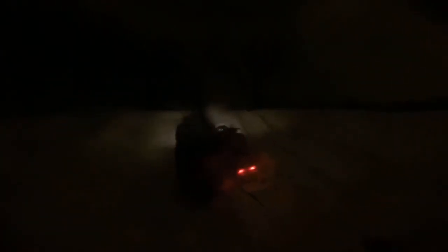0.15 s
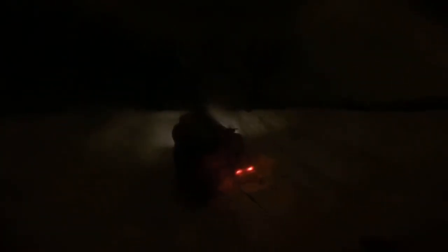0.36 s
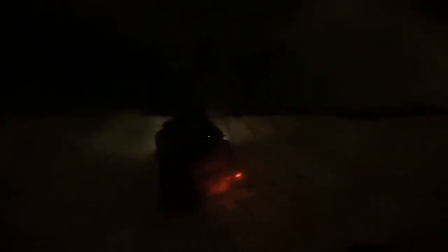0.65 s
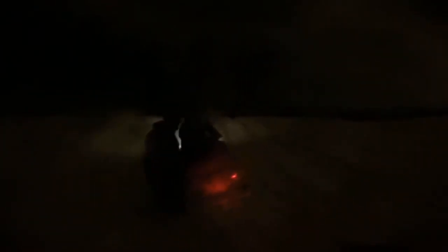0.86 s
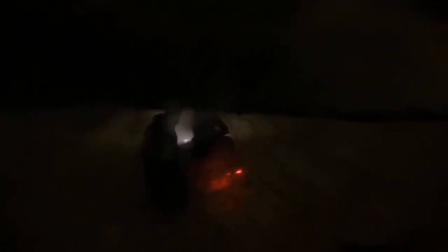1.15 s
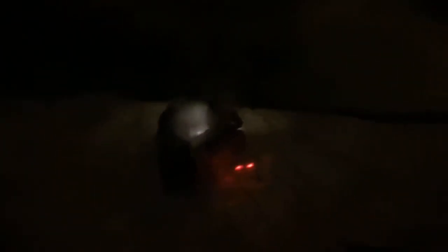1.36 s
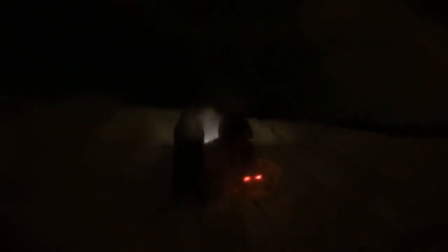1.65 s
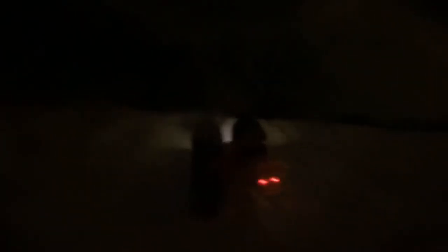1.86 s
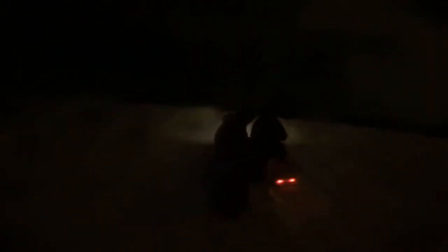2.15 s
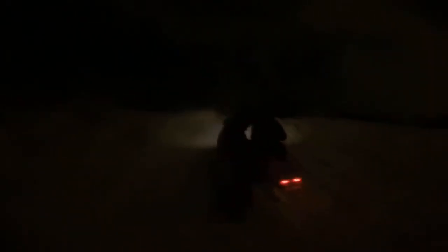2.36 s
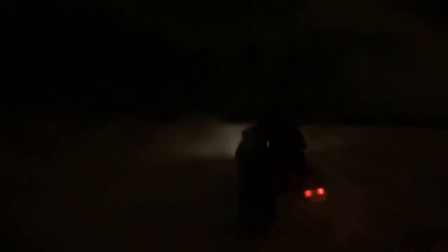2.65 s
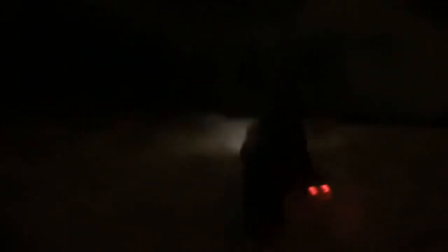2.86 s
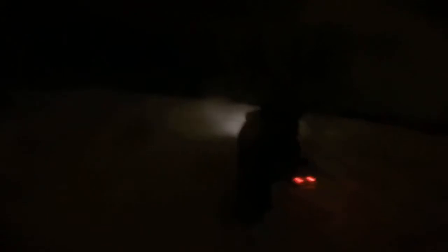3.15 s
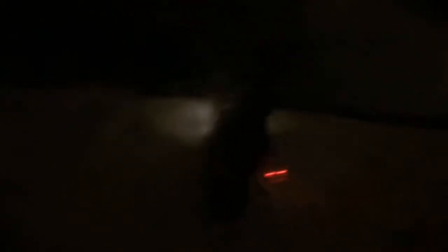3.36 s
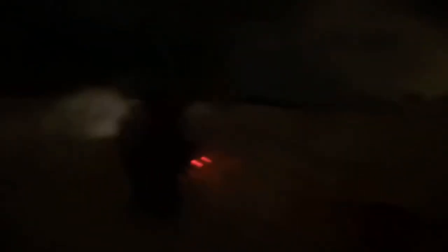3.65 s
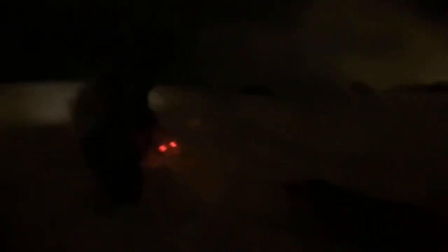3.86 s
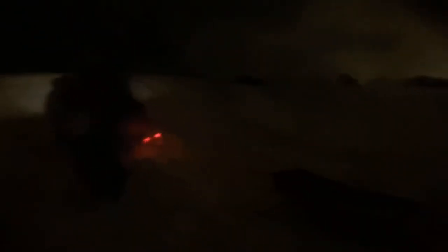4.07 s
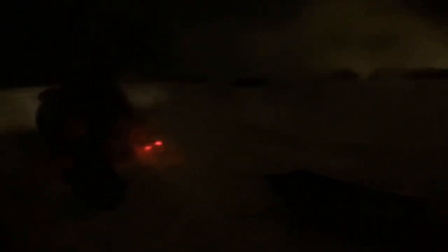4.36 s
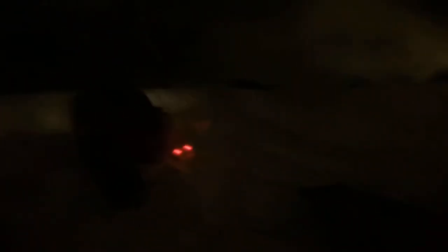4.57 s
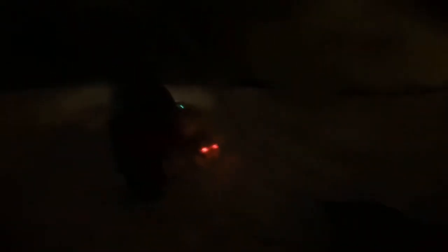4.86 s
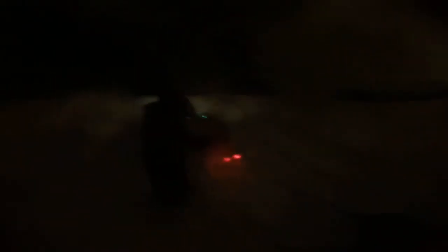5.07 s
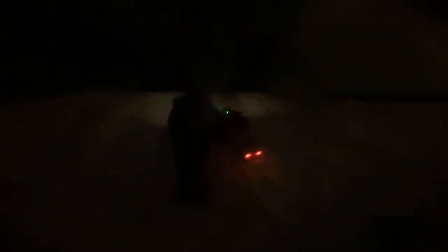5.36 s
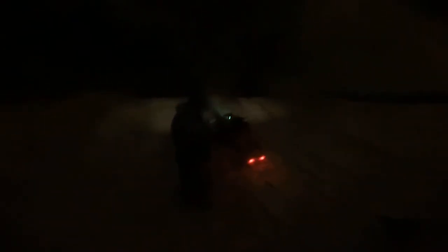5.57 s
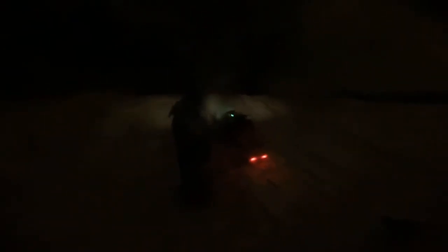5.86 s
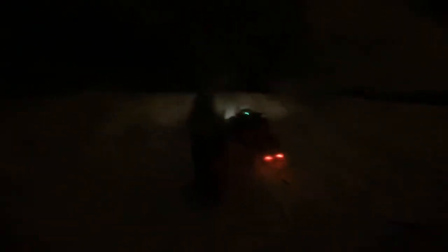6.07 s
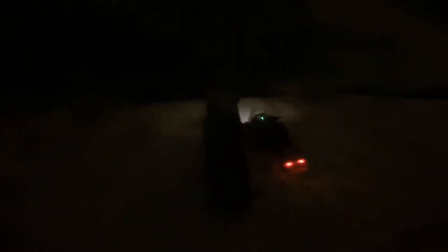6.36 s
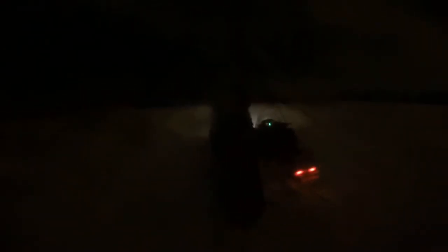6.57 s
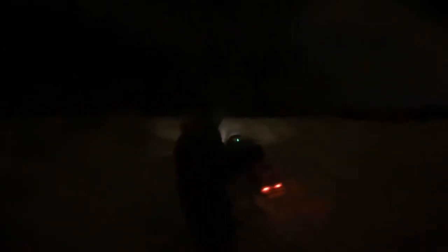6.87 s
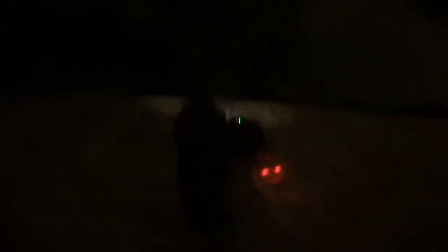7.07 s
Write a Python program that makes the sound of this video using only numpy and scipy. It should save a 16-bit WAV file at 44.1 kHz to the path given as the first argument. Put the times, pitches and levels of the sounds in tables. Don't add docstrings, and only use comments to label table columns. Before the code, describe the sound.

A snowmobile idles lumpily on open snow, revs up with a belt howl, drops to a steady idle; sharp plastic snaps and wind thumps close by.

```python
import sys
import numpy as np
from scipy import signal
from scipy.fft import next_fast_len
from scipy.io import wavfile
from scipy.ndimage import uniform_filter1d

SR = 44100
rng = np.random.default_rng(int(sys.argv[2]) if len(sys.argv) > 2 else 0)


def to_linear_factor(level_db):
    exponent = np.asarray(level_db, float) / 20
    return 10 ** exponent


def transcribe(signal):
    frames = np.atleast_2d(signal).T
    limited = np.clip(frames, -1, 1)
    pcm = np.round(limited * 32767).astype(np.int16)
    wavfile.write(sys.argv[1], SR, pcm)


N = 318428
T = np.arange(N) / SR
F = np.fft.rfftfreq(next_fast_len(N), 1 / SR)


def curves(table):
    s, *columns = np.transpose(table)
    return [np.interp(T, s, c) for c in columns]


def swells(rows):
    coarse = T[::32]
    total = sum(db * np.exp(-((coarse - s) / half) ** 2) for s, db, half in rows)
    return np.interp(T, coarse, total)


def slope(points):
    hz, db = np.transpose(points)
    return to_linear_factor(np.interp(np.log(F + 1), np.log(hz), db, left=-120, right=-120))


def noise(gain, shift=0):
    spectrum = gain * (rng.standard_normal(len(F)) + 1j * rng.standard_normal(len(F)))
    x = np.fft.ifft(spectrum, next_fast_len(N))[:N]
    if np.ndim(shift):
        x = x * np.exp(1j * shift)
    return x.real / np.std(x.real)


def resonance(hz, half_width):
    return 1 / (1 + ((F - hz) / half_width) ** 2)


def walk(rate):
    k = int(SR / rate)
    held = np.repeat(rng.standard_normal(N // k + 1), k)
    return 1.337 * uniform_filter1d(uniform_filter1d(held, k), k)[:N]


# centre in seconds, strength in dB over the lull, half length in seconds.
GUST_SWELLS = [(.17, -2, 0.053), (.54, 2, .05), (1.33, 6, 0.078), (1.974, 14, 0.047), (2.45, 10, 0.11),
               (2.9, 12.5, 0.14), (3.64, 7, .08), (3.899, 7, 0.048), (4.15, 9.5, 0.11), (4.5, 7.5, .05),
               (4.854, 14, 0.15), (5.42, 12.5, .1), (5.7, 9, .06), (5.95, 5.5, .1), (6.634, 13, 0.13),
               (7.0, 13, .07)]


def wind():
    gust_db = swells(GUST_SWELLS)
    buffet_db = -53 + gust_db
    rumble_db = -55 + 0.73 * gust_db + 2.2 * walk(14)
    buffet = noise(slope([(3, -2), (7, -4.5), (16, -6), (26, -25.5)]))
    rumble = noise(slope([(18, 3), (26, 5.0), (45, -22), (70, -29.0), (110, -28)]))
    return to_linear_factor(buffet_db) * buffet + to_linear_factor(rumble_db) * rumble


# centre in seconds, pitch in Hz, peak
# in dB, half length in seconds.
DULL_THUMPS = [
    (1.284, 58.4, -43, 0.043),
    (1.96, 74.6, -43, 0.051),
    (3.895, 27.87, -33.5, 0.03),
    (3.9, 189.3, -53, 0.022),
    (4.12, 147.5, -59, 0.02),
    (6.72, 140.6, -47, 0.021),
    (7.18, 440, -56, 0.028),
]


def thumps():
    return sum(to_linear_factor(db) * np.exp(-((T - s) / half) ** 2) * np.sin(2 * np.pi * hz * (s - T))
               for s, hz, db, half in DULL_THUMPS)


# start in seconds, casing body in dB, seam in dB, crispness in dB, hollowness in dB.
CASING_SNAPS = [(0.4328, -52, -55.5, -5, -4), (0.5718, -35.5, -47, 0, 6), (2.13, -11, -18.5, -7, 0.5),
                (3.0015, -28, -29.5, 0.5, -3.5), (3.0059, -39, -54, -1.1, -2), (3.0421, -41, -42.5, -6, 16),
                (3.2896, -23.5, -34.5, 0.5, 6), (3.37, -22.5, -25, 0.5, -3), (4.1984, -45.5, -50, -7, 0),
                (4.2731, -52.5, -64.5, -18, -5), (4.6643, -64, -40.5, -7, 0), (4.9933, -14, -25, 5.5, 50),
                (5.3532, -58, -50.5, -3, -3), (5.5294, -24.5, -21, -11.5, 4), (5.7985, -45, -42, -9, 5),
                (5.8603, -31, -37, -0.5, 2), (6.1841, -45.5, -60, 3, -1), (1.683, -62, -55, 0, .1),
                (1.503, -70, -71, 8, .1)]
# pitch in Hz, decay in seconds, level in dB.
CASING_MODES = [
    [(1574, 0.0037, -11), (2120, 0.0015, -3.5), (2567, 0.0007, 8), (2366, 0.0044, -19.5),
     (2080, 0.0051, -23)],
    [(4040, 0.00081, 6.5), (4680, 0.00047, 11.5)],
    [(6550, 0.00053, 11), (7330, 0.00027, 17)],
    [(8840, 0.00032, 16.5), (9700, 0.00032, 14.5), (12500, 0.00041, 11.5), (13400, 0.00016, 7)],
    [(3310, 0.00034, 16.5)],
]


def snaps():
    out, t = np.zeros(N + 900), np.arange(900) / SR
    chance = rng.standard_normal((len(CASING_SNAPS), len(t)))
    onset = 1 - np.exp(-t / .00008)
    for (s, body, seam, crisp, hollow), grit in zip(CASING_SNAPS, chance):
        middle = (body + seam) / 2 - hollow
        range_db = [body, middle, seam, seam + crisp, (body + middle) / 2]
        blow = 0.036 * grit * np.exp(-t / 0.00063)
        second_slip = int(18 + 3 * grit[1])
        blow[0], blow[second_slip] = 1, .35
        ring = sum(to_linear_factor(level_db + db) * np.sin(2 * np.pi * hz * t) * np.exp(-t / tau)
                   for level_db, modes in zip(range_db, CASING_MODES) for hz, tau, db in modes)
        i = int((s + 0.000974) * SR)
        out[i:i + len(t)] -= np.convolve(blow, ring * onset)[:len(t)]
    return signal.sosfilt(signal.butter(5, 1500, "highpass", fs=SR, output="sos"), out[:N])


# time in seconds, pitch in Hz, level in dB.
BELT_HOWL = [
    (1.1, 1500, -84),
    (1.3, 1473, -53),
    (1.6, 1430, -65.5),
    (2.1, 1504, -73),
    (2.2, 1671, -45.5),
    (2.7, 1651, -51),
    (2.85, 1554, -54),
    (3.05, 1432, -51),
    (3.3, 1337, -72),
]


def belt():
    hz, db = curves(BELT_HOWL)
    out = 0
    for ratio, half_width, rel_db in [(1, 80, -0.5), (1.42, 250, -8), (2.8, 600, -14)]:
        slide = 2 * np.pi * ratio * np.cumsum(hz - 1500) / SR
        rub = noise(resonance(1500 * ratio, half_width), slide)
        out = out + to_linear_factor(db + rel_db + 2.0 * walk(34)) * rub
    return out


# time in seconds, clatter in dB, shading by the figure beside the sled in dB.
GEAR_CLATTER = [(0, 0, 0.5), (.28, -3, 5), (.56, -1, 3), (1.05, -4.5, 6.5), (1.22, 4.5, 5.5),
                (1.65, 10, -2), (2.05, 8, 4), (2.5, 13, -1), (2.7, 10.5, 4), (2.93, 1.8, 4.5),
                (3.2, -1.5, 2.5), (3.56, -3, 6), (3.86, -4, 13), (4.4, -3.5, 9.5), (5.05, 6.5, 3.5),
                (5.59, 1.4, 1), (6.3, 5.5, 2), (7.22, 0.5, 3.5)]
# level in dB, share of clatter, share of shading, dB more at full revs.
RATTLING_PARTS = [
    (-64, 0.28, -0.2, 0),
    (-55, 0.58, 0.63, -1.1),
    (-57, 0.41, -0.69, -3),
    (-58.5, 0.93, 0.1, 0.6),
    (-77, 0.36, 0.095, 8.5),
]
# centre in seconds, height in dB, half length in seconds.
CLUTCH_RASP = (1.575, 3.3, 0.02)


def part_levels(clatter, shade, revs):
    range_db = [db + a * clatter + b * shade + c * revs for db, a, b, c in RATTLING_PARTS]
    range_db[2] = range_db[2] + swells([CLUTCH_RASP])
    return range_db


# frequency in Hz, density in dB per Hz.
RATTLE_COLOUR = [(290, -40), (500, -16), (803, -14.5), (1150, -7.5), (1240, -14), (1560, -4.5), (1960, -9),
                 (2500, 1.5), (2800, -7.5), (3100, -7.5), (3960, -15), (4500, -8.5), (7890, -25),
                 (14200, -33.5), (15500, -32)]
# pitch in Hz, width in Hz, level in dB against the rattle of that range,
# dB lost per dB of louder running.
RINGING_PANELS = [(893, 110, -11.5, -0.8), (1245, 31, -11, -0.2), (1554, 410, -6, -0.4),
                  (2067, 250, -12, -3), (2490, 49, -4.5, -0.3), (3167, 250, -9.5, 0),
                  (3534, 370, -9.5, 0.03), (4290, 120, -11, 0), (4745, 1300, -11.5, -1),
                  (5900, 80, -10.5, 0), (6730, 1000, -14, -1.5), (9600, 480, -8, 0),
                  (11300, 1200, -5, -0.2)]


def machinery(turn, range_db):
    centres = np.log([750, 1500, 2500, 4700, 10500])
    colour = slope(RATTLE_COLOUR)
    jolt = 1 + 0.061 * np.cos(2 * turn) + 0.12 * np.cos(turn)
    typical = [np.mean(db[T > T[-1] - 1.3]) for db in range_db]
    together = walk(25)

    def shares(hz):
        return [np.interp(np.log(hz), centres, row) for row in np.eye(len(centres))]

    out = 0
    for hz in 500 * 2 ** (np.arange(16) / 3):
        band = colour * np.cos(np.clip(3 * np.log2(F / hz + 1e-9), -1, 1) * np.pi / 2)
        change = sum(w * (db - t) for w, db, t in zip(shares(hz), range_db, typical))
        flicker = walk(12) + 1.06 * together
        weight = np.linalg.norm(band) / np.linalg.norm(colour)
        out = out + weight * to_linear_factor(-51.5 + change + flicker) * noise(band)
    for hz, width, db, loss in RINGING_PANELS:
        near_db = sum(w * (r - loss * (r - t)) for w, r, t in zip(shares(hz), range_db, typical))
        drift = 2 * np.pi * np.cumsum(.006 * hz * walk(6)) / SR
        ring = noise(resonance(hz, width / 2), drift)
        out = out + to_linear_factor(near_db + db + .5 * walk(4.8) + 2.2 * walk(28)) * ring
    return jolt * out


# time in seconds, crank speed in Hz, throttle from 0 to 1, firing note in dB.
ENGINE_COURSE = [(0, 50.3, 0.36, -43.5), (1.05, 50.6, 0.4, -48), (1.15, 50.3, 0.36, -56.5),
                 (1.28, 55.15, 0.26, -41.5), (1.37, 63.3, 0.74, -43), (1.46, 69.57, 0.52, -47),
                 (1.58, 73.64, 0.71, -48.5), (1.9, 73.86, 0.93, -44.5), (2.08, 77.55, 1.05, -46),
                 (2.26, 84.24, 1.11, -44.5), (2.38, 88.4, 0.88, -38), (2.52, 88, 0.8, -41),
                 (2.68, 82.3, 0.23, -55.5), (3.07, 58.4, 0, -62), (3.23, 53.03, 0.26, -55.5),
                 (3.5, 50.6, 0.01, -55), (6.7, 51.57, 0, -54), (7.22, 51.5, 0.05, -51.5)]
# time in seconds, boost in dB.
HARD_FIRINGS = [(0.026, 7.5), (0.11, 4), (0.146, 4), (0.177, 2), (0.283, 4), (0.385, 6), (0.499, 7),
                (0.536, -4), (0.596, 6), (0.679, 7), (0.758, 6), (0.835, 5), (0.917, 9), (0.987, 2),
                (1.025, 9), (1.071, 11), (1.107, 10), (1.14, 15), (1.174, 14.5)]
# order, level in dB throttle shut, level in dB throttle open.
SIDE_ORDERS = [(1, -61, -83), (3, -67, -64), (4, -63.5, -60.5), (5, -82, -63), (6, -66.5, -63.5),
               (7, -76, -65), (8, -71.5, -66)]
# pitch in Hz, half width in Hz, gain in dB, share left on shut throttle.
PIPE_RESONANCES = [(228, 21.6, 11.5, 1), (440, 55, 19, 0.067), (338, 40, 3, 0.74), (744, 63, -8, .9)]


def running(shade):
    crank_hz, throttle, firing_db = curves(ENGINE_COURSE)
    revs = np.clip((crank_hz - 51) / 38, 0, 1) ** 2
    lumpy = T < HARD_FIRINGS[-1][0]
    gaining = uniform_filter1d(np.gradient(crank_hz) * SR, 4000)

    overrun = np.clip(-gaining / 60, 0, 1) ** 2
    snatch = np.clip(gaining / 45 - 1, 0, 1) * (crank_hz < 62)
    rough = .14 + .16 * lumpy + .55 * overrun + .5 * snatch

    def pipe(f):
        return sum(db * (left + (1 - left) * throttle) * np.exp(-((f - hz) / width) ** 2)
                   for hz, width, db, left in PIPE_RESONANCES)

    order_db = []
    for k, shut, wide in SIDE_ORDERS:
        db = shut + (wide - shut) * throttle + pipe(k * crank_hz)
        db = db + 0.44 * shade * (1 - throttle) * (k > 5)
        db = db - 3 * rough * (gaining < 0) - 11.5 * lumpy * (1 - throttle)
        order_db.append(db)
    kicks_db = swells((s, db, .014) for s, db in HARD_FIRINGS)
    order_db.insert(1, firing_db + kicks_db - 1.9 * lumpy)

    open_share = np.clip(1.5 * throttle, 0, 1) * (crank_hz > 66)
    sharp_db = -75.5 + (-55.5 + 75.5) * open_share - 15 * revs
    roar_db = -58.5 + 5 * rough + 11.5 * revs - 3 * lumpy
    return crank_hz, revs * throttle, order_db, rough, uniform_filter1d(sharp_db, size=4000), roar_db


# order, level in dB against the pulse sharpness.
UPPER_ORDERS = [(9, -4), (10, -8.5), (11, -15), (12, -2.5), (13, -24), (14, -6.5), (15, -6), (16, -9),
                (17, -3.5), (18, 3), (19, -23), (20, -0.5)]
# frequency in Hz, density in dB per Hz.
ROAR_COLOUR = [(40, -3), (70, 4.5), (110, 0), (160, -1), (250, -0.5), (400, -7), (520, -10), (700, -16.5)]


def exhaust(turn, order_db, rough, sharp_db, roar_db):
    lines = list(enumerate(order_db, 1)) + [(k, db + sharp_db) for k, db in UPPER_ORDERS]
    slip = rough * walk(20) / 4
    drone = 0
    for k, db in lines:
        waver_db = rough * ((5 + k / 2) * walk(16) - 3)
        waver = rough * walk(14) * min(k / 3, 4)
        phase = k * (turn + slip) + waver + 2 * np.pi * rng.random()
        drone = drone + np.sqrt(2) * to_linear_factor(db + waver_db) * np.sin(phase)
    return drone + to_linear_factor(roar_db + 1.84 * walk(12)) * noise(slope(ROAR_COLOUR))


def scene():
    clatter, shade = curves(GEAR_CLATTER)
    crank_hz, revs, *burning = running(shade)
    turn = 2 * np.pi * np.cumsum(crank_hz) / SR
    camera = wind() + thumps() + snaps()
    sled = belt() + machinery(turn, part_levels(clatter, shade, revs)) + exhaust(turn, *burning)
    mono = camera + sled
    return np.array([mono, mono])


def top_cut(x):
    return signal.sosfilt(signal.butter(12, 16570, fs=SR, output="sos"), x)


def record(dry):
    step_down = signal.ellip(5, .5, 28, 14900, fs=SR, output="sos")
    mix = np.clip(signal.sosfilt(step_down, dry), -1, 1)
    return top_cut(mix)


dry = scene()
out = record(dry)
transcribe(out)
```